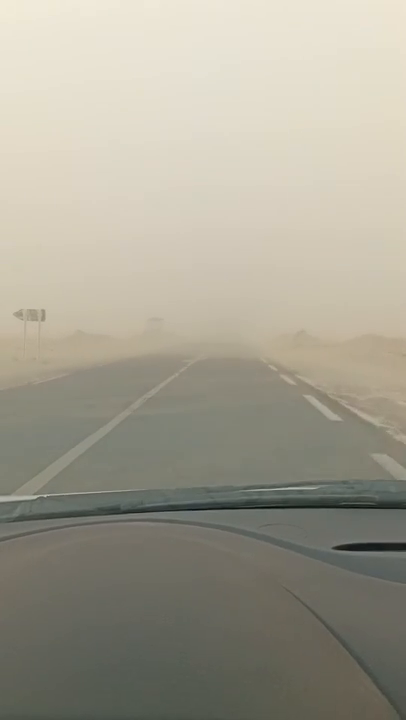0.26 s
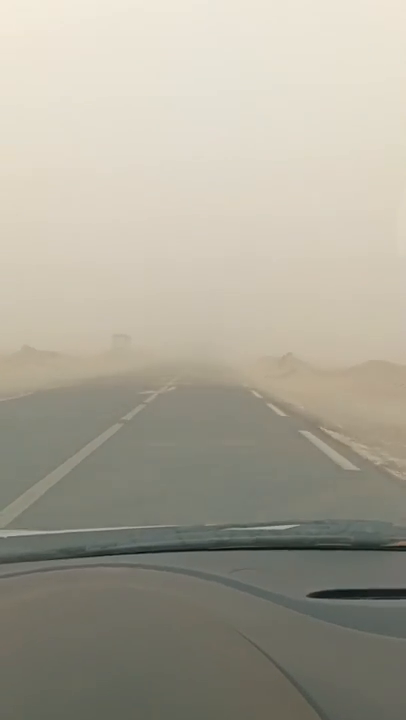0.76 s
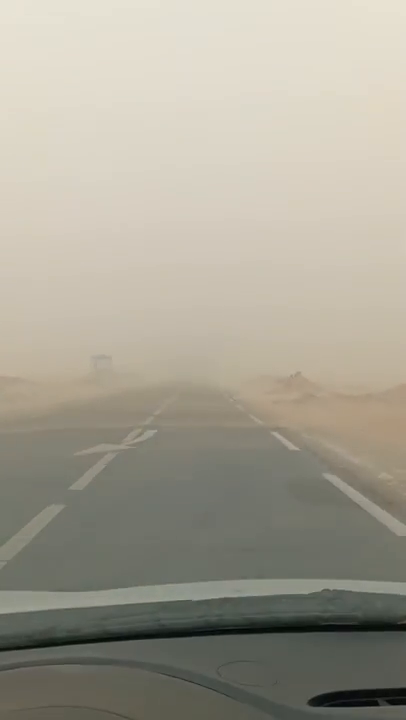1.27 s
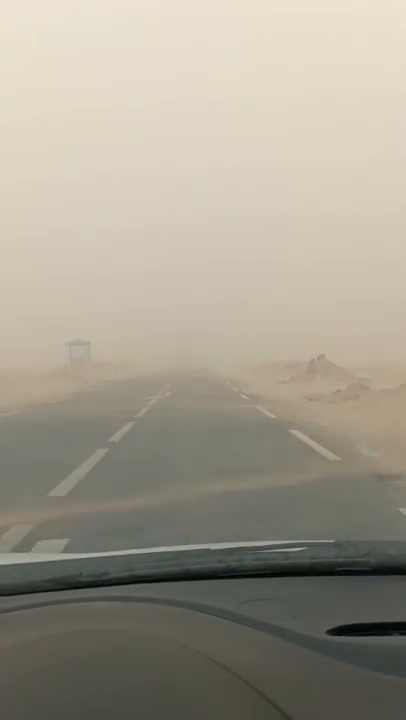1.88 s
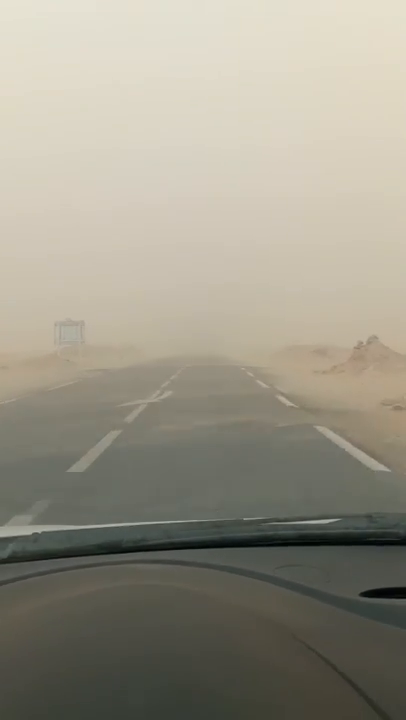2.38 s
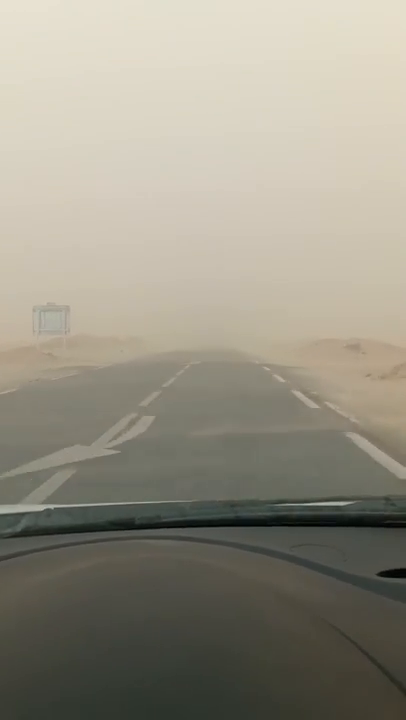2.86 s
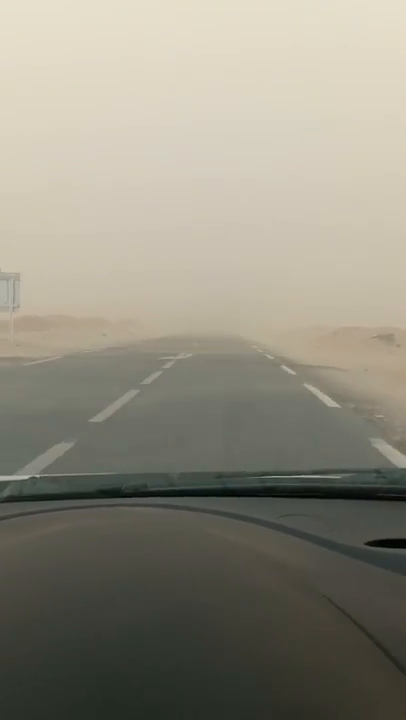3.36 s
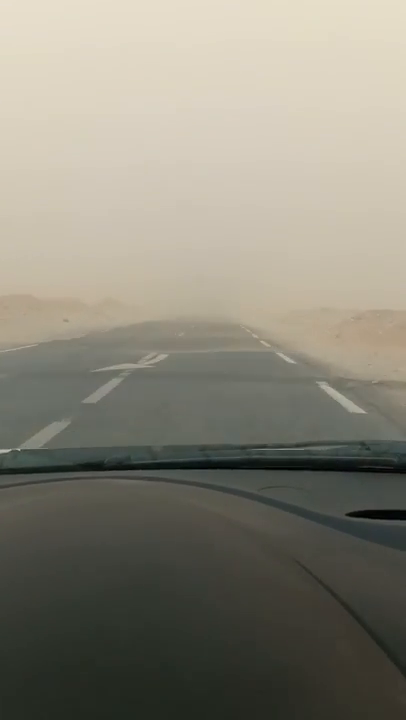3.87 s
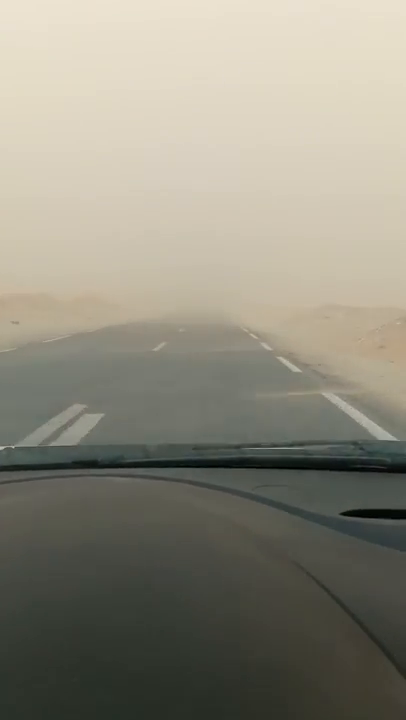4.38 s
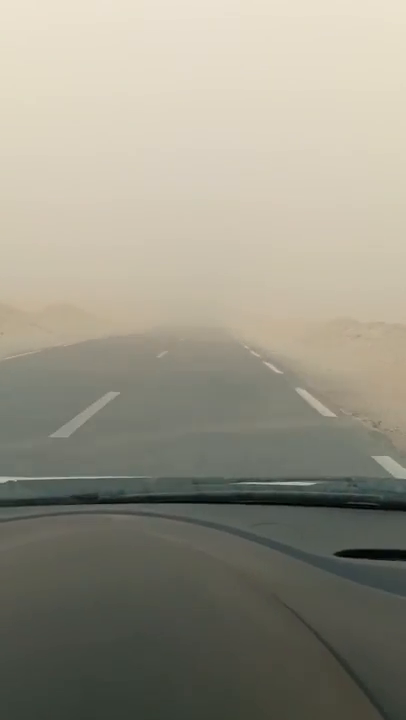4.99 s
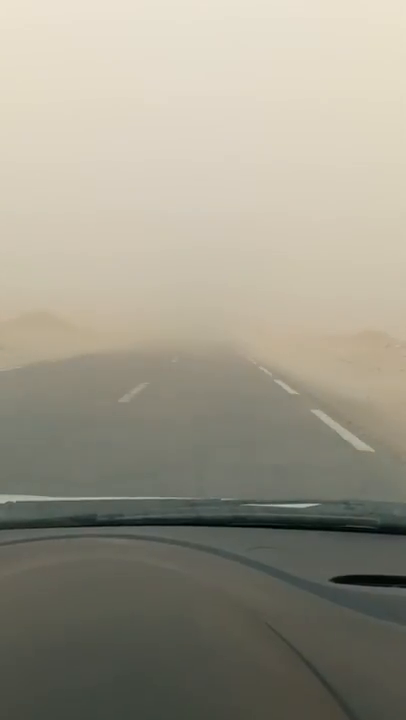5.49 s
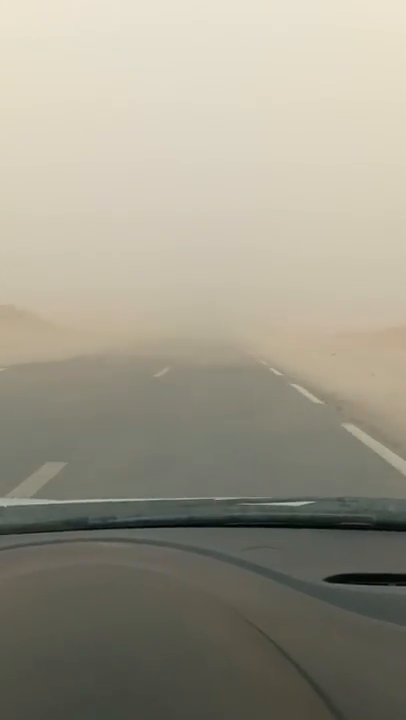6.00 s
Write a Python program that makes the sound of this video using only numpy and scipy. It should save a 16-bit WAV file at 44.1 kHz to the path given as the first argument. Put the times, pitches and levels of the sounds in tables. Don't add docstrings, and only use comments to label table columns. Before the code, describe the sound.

Inside a car cruising through a sandstorm, road bumps boom low over engine hum and tyre roar while sand and small stones hit the glass.

```python
import sys
import numpy as np
from scipy import signal
from scipy.fft import rfft, irfft, next_fast_len
from scipy.io import wavfile
from scipy.ndimage import uniform_filter1d, map_coordinates

SR = 44100
rng = np.random.default_rng(int(sys.argv[2]) if len(sys.argv) > 2 else 0)


def boost(x):
    u = np.asarray(x, float) / 20
    return 10 ** u


def unload_wav(signal):
    wavfile.write(
        sys.argv[1],
        SR,
        np.round(np.clip(np.atleast_2d(signal).T, -1, 1) * 32767).astype(np.int16),
    )


N = 275625
COARSE = np.arange(0, N, 32)


def unit(x):
    return x / np.sqrt(np.mean(x ** 2) + 1e-20)


def along(points, hz):
    f, v = np.transpose(points)
    return np.interp(np.log(hz + 1), np.log(f + 1), v)


def curves(rows):
    s, *cols = np.transpose(rows)
    return [np.interp(np.arange(N) / SR, s, c) for c in cols]


def wobble(rate_hz):
    knots = rng.standard_normal(int(N * rate_hz / SR) + 4)
    return map_coordinates(knots, [np.arange(N) * rate_hz / SR])


def filtered(x, response):
    m = next_fast_len(N + SR // 2)
    return irfft(rfft(x, m) * response(np.fft.rfftfreq(m, 1 / SR)), m)[..., :N]


def passed(x, low_hz, high_hz):
    sos = signal.butter(4, [float(low_hz), float(high_hz)], "bandpass", fs=SR, output="sos")
    return signal.sosfilt(sos, x) * np.sqrt(SR / 2 / (high_hz - low_hz))


def resonance(hz, width_hz):
    return lambda f: (1j * f * width_hz / (hz * hz - f * f + 1j * f * width_hz)) ** 1.864


def shape(points):
    return lambda f: boost(along(points, f))


def rush(response, patchy_db, grain=1):
    # frequency in Hz, left-right likeness from 0 to 1.
    alike = [(20, .94), (60, .945), (190, .985), (290, .95), (430, .62), (640, .3), (1400, .04), (15000, 0)]
    # frequency in Hz, left over right in dB.
    lean = [(25, 1), (60, 0), (150, -.5), (280, -4.8), (600, -.6), (1100, 3), (2300, 5), (4400, 3),
            (8100, 5.5), (15000, 3)]
    _, _, z = signal.stft(rng.standard_normal((2, N)) * grain, SR, nperseg=512)
    patches = uniform_filter1d(rng.standard_normal(z.shape[1:]), size=6, axis=0)
    patches = uniform_filter1d(patches, size=12, axis=1)
    pair = signal.istft(z * boost(patchy_db * unit(patches)), nperseg=512)[1][:, :N]
    f = np.fft.rfftfreq(N, 1 / SR)
    turn = np.arccos(along(alike, f)) / 2
    mid, side = rfft(pair) * response(f) * [np.cos(turn), np.sin(turn)]
    tilt = boost(np.outer([.5, -.5], along(lean, f)))
    pair = irfft(np.array([mid + side, mid - side]) * tilt, N)
    return pair / np.sqrt(np.mean(pair.mean(axis=0) ** 2))


def evened(x, seconds):
    power = uniform_filter1d(x.mean(axis=0) ** 2, size=round(seconds * SR))
    return x / np.sqrt(np.abs(power) + 0.17)


def swell(start_s, length_s, rise_s, fall_s):
    t = COARSE / SR - start_s
    return np.clip(t / rise_s, 0, 1) ** 2 * np.exp(-np.maximum(t - length_s, 0) / fall_s)


def bell(middle_s, length_s):
    return np.exp(-4 * ((COARSE / SR - middle_s) / length_s) ** 2)


def added(steady, events):
    return np.sqrt(steady + np.interp(np.arange(N), COARSE, events))


def engine():
    # time in seconds, hum level in dB.
    load = [(0, -41.5), (.3, -39.5), (.7, -35), (.9, -36), (1.6, -42), (1.8, -28.5), (2.3, -38),
            (2.5, -29.5), (3.3, -34.5), (3.9, -33), (4.3, -38), (4.7, -32), (5.05, -36), (5.25, -30),
            (5.6, -35.5), (5.85, -28.5), (6.25, -33)]
    # multiple of the firing rate, level in dB.
    orders = [(1, 4), (2, -12.5), (3, -28.5), (4, -13.5)]
    firing_hz = 60.1
    db, = curves(load)
    phase = 2 * np.pi * np.cumsum(firing_hz * (1 + 0.0352 * wobble(11))) / SR
    hum = sum(boost(level + 3.2 * wobble(22)) * np.sin(k * phase) for k, level in orders)
    return boost(db - 3.5) * hum * boost([[.3], [-.3]])


def road():
    # time in seconds, tyre roar in dB (coarseness of the tarmac).
    tarmac = [(0.0, -38), (1.51, -38.5), (1.65, -38), (1.9, -37.5), (2.18, -38.5), (2.58, -37), (2.77, -38),
              (5.24, -39.5), (5.83, -37.5), (6.25, -37)]
    # middle in seconds, strength in dB, floor over cabin boom in dB, length in seconds.
    bumps = [(0.076, -40, 11.5, 0.096), (0.227, -28.5, 3, 0.085), (.37, -26.5, -4.5, 0.047),
             (0.621, -22.5, -17, 0.077), (0.747, -29, -10, 0.036), (1.03, -30.5, -17, 0.034),
             (1.594, -22.5, -7.5, 0.031), (1.83, -39.5, 7, .08), (1.922, -41, 13, 0.02),
             (2.26, -25, -3, 0.047), (2.443, -32, -20, 0.078), (2.477, -28, -26, 0.12),
             (2.685, -28, 3.5, 0.027), (3.016, -37, -7, 0.094), (3.224, -22.5, -11, 0.042),
             (3.373, -22, -2.5, 0.042), (3.74, -29, -3.5, 0.086), (4.065, -29, -20, .06),
             (4.509, -27, 1.5, 0.082), (4.567, -28, -13, 0.059), (4.681, -26.5, -8, .08),
             (5.494, -34, 3.5, 0.076), (5.688, -27, 4, .09), (5.873, -27.5, -38, .08),
             (5.97, -37.5, 5, 0.038), (6.109, -35, 12, 0.027)]
    # middle in seconds, strength in dB, length in seconds.
    heaves = [(0.39, -44, 0.11), (0.64, -37, 0.1), (0.756, -35, 0.071), (1.07, -39, 0.1), (1.62, -33, 0.16),
              (1.753, -31.5, .1), (2.067, -36.5, .1), (2.477, -37.5, 0.088), (2.725, -43.5, 0.083),
              (3.25, -33.5, .15), (3.448, -36, .12), (4.25, -35, .1), (4.702, -33, 0.1),
              (5.723, -42, 0.093), (5.897, -36.5, 0.11), (6.116, -32, 0.23)]
    # frequency in Hz, density in dB per Hz.
    thud_spectrum = [(14, -40), (25, -12), (32, -3), (42, 0), (55, 0), (75, -2), (90, -3), (110, -20),
                     (200, -60)]
    # frequency in Hz, density in dB per Hz.
    roar_spectrum = [(100, -50), (170, -3.5), (286, -10.5), (319, -12.5), (382, -6.5), (447, -12),
                     (643, -14.5), (786, -19.5), (876, -18.5), (1080, -23), (1170, -33), (1500, -33.5),
                     (1950, -54), (3300, -120)]
    thud_db, boom_db, panel_db = -1.5, 2.5, 2
    bump_roar_db = -15

    roar = boost(curves(tarmac)[0]) ** 2
    boom = sum(boost(db) ** 2 * bell(s, length) for s, db, _, length in bumps)
    panel = sum(boost(db + floor_db) ** 2 * bell(s, length) for s, db, floor_db, length in bumps)
    spring = sum(boost(db) ** 2 * bell(s, length) for s, db, length in heaves)

    suspension = evened(rush(shape(thud_spectrum), patchy_db=-4.0), seconds=0.21)
    cabin_air = evened(rush(resonance(hz=110.5, width_hz=38.8), patchy_db=4.0), seconds=0.049)
    floor = evened(rush(resonance(hz=164.4, width_hz=19.8), patchy_db=-0.5), seconds=0.045)
    low = added(roar * boost(2 * thud_db), spring) * suspension
    low += added(roar * boost(2 * boom_db), boom) * boost(2.0) * cabin_air
    low += added(roar * boost(2 * panel_db), panel) * boost(-1.5) * floor

    whine = rush(resonance(hz=868, width_hz=20.7), patchy_db=2.0)
    tread = rush(shape(roar_spectrum), patchy_db=0.5) + boost(-19) * whine
    tread_gain = added(roar, (boom + panel) * boost(2 * bump_roar_db))
    return low + tread_gain * boost(0.15 * wobble(13)) * tread


def trim():
    # time in seconds, peak in dB, pitch in Hz, left over right in dB.
    knocks = [(0.312, -39, 656, -2), (0.592, -31.5, 558, -7), (0.751, -29.5, 518, -3),
              (1.559, -29, 555, -11), (1.711, -31.5, 502, -10), (1.739, -44, 617, 10),
              (1.767, -33, 526, -7), (2.239, -31, 696, -8), (2.404, -31.5, 630, -5), (2.446, -37, 560, -7),
              (2.517, -33, 545, -8), (2.609, -33, 530, -7.5), (2.663, -30, 680, -3), (2.821, -34, 718, 3),
              (3.383, -32, 616, 2.5), (4.318, -57, 506, -14), (5.659, -30.5, 537, -4),
              (5.859, -38, 590, -7), (6.229, -38.5, 680, 2)]
    modes = [(.6, 0.63), (.86, 0.72), (1, 1), (1.12, 0.55), (1.3, 0.12)]
    t60_s, attack_s = 0.087, .0022
    out, t = np.zeros((2, N + SR)), np.arange(SR // 5) / SR
    fade = boost(-60 * t / t60_s) * (1 - np.exp(-t / attack_s))
    for s, db, hz, pan_db in knocks:
        phase = rng.uniform(-0.61, 1.0, (2, 1))
        ring = sum(gain * np.sin(2 * np.pi * k * hz * t + phase) for k, gain in modes)
        level = boost(db + 1.0 + pan_db * np.array([[.5], [-.5]]))
        out[:, round(s * SR):][:, :len(t)] += level * ring * fade
    return out[:, :N]


def storm():
    # time in seconds, wind at the door seals in dB.
    wind_curve = [(0.0, -53.5), (0.5, -55.5), (0.75, -53.5), (3.04, -55), (3.36, -53), (5.59, -56.5),
                  (5.97, -52), (6.25, -61)]
    # start in seconds, length in seconds, sand in dB, finest dust over it in dB.
    sheet_rows = [(0.162, 0.088, -62.5, -15.5), (0.58, 0.12, -59.5, -19), (0.784, 0.21, -54.5, -15),
                  (1.384, 0.3, -56, -9), (1.587, 0.18, -57, -11), (1.965, 0.28, -64, -13),
                  (2.16, 0.23, -62, -12.5), (2.954, .04, -57.5, -10.5), (3.1, 0.25, -58.5, -13.5),
                  (3.46, .4, -69, -8), (3.939, 0.035, -56, -12), (4.092, 0.038, -56.5, -12.5),
                  (4.24, .25, -60.5, -11.5), (4.66, 0.24, -69.5, -12.5), (4.961, 0.046, -60, -6.5),
                  (5.024, 0.063, -59, -12), (5.765, .15, -58, -6.5), (5.87, .4, -55, -8.5)]
    # frequency in Hz, density in dB per Hz.
    seal_spectrum = [(650, -9.5), (1100, -3.5), (1200, -5), (1600, -9), (1800, -4.5), (2400, -7.5),
                     (2900, -12), (3400, -19), (5000, -24), (8000, -56.5), (15000, -120)]
    sand_spectrum = [(1300, -30), (2200, 2), (2900, -2), (3300, -10.5), (3750, -2.5), (4600, -5),
                     (5300, -1), (5750, -5), (6550, -12.5), (8000, -21.5), (9700, -43), (11500, -37),
                     (17600, -56)]
    dust_spectrum = [(6500, -22), (7600, -11.5), (9700, -12), (11300, -3), (12600, -6), (13700, 5),
                     (15600, -3.5), (17000, -28.5)]
    rise_s, fall_s = .045, 0.029
    sheet_wind_db = -4.5
    drift_db, drift_dust_db = -67.5, -19
    drift_grows = 1.5

    wind_db, = curves(wind_curve)
    drift = boost(drift_db + drift_grows * (wind_db - wind_db.mean())) ** 2
    sheets = [boost(db) ** 2 * swell(s, length, rise_s, fall_s) for s, length, db, _ in sheet_rows]
    dust = sum(sheet * boost(2 * row[3]) for sheet, row in zip(sheets, sheet_rows))
    grain = boost(3.4 * np.minimum(rng.exponential(size=(2, N)), 5))
    coarse = rush(shape(sand_spectrum), patchy_db=0.9, grain=grain)
    coarse = added(drift, sum(sheets)) * boost(1.0) * coarse
    fine = rush(shape(dust_spectrum), patchy_db=2.0, grain=grain)
    fine = added(drift * boost(2 * drift_dust_db), dust) * boost(-4.0) * fine
    gusts = added(boost(2 * wind_db), sum(sheets) * boost(2 * sheet_wind_db))
    wind = gusts * boost(0.95 * wobble(23)) * rush(shape(seal_spectrum), patchy_db=-2.6)
    return boost(1.1 * wobble(37)) * (coarse + fine) + wind


def stones():
    # time in seconds, low ring in dB, high ring over low in dB, fizz over high ring in dB.
    hits = [(0.175, -50.5, 1, -8), (.633, -43.5, -7, -19), (.6477, -37, -19, -16), (.6678, -46.5, 3, -15.5),
            (0.6802, -31, -2.5, -5.5), (0.697, -44.5, 0.5, -5), (.757, -43, -3.5, -12),
            (1.3396, -51, 1, -24), (1.3765, -51, 4, -9.5), (1.4044, -53, 3.5, -13), (1.418, -53.5, 10, -14),
            (1.764, -34, -30, -4), (2.4554, -45, -8, -4), (2.9666, -46.5, 0.5, -13),
            (3.3974, -26, -20, -14), (3.4204, -44.5, -6, -22), (3.483, -52, -12.5, -12),
            (3.512, -54.5, 1, -21), (3.5734, -46, -16, -13), (3.738, -40.5, -20, -11),
            (3.9344, -53.5, 5.5, -9), (3.954, -50, 7.5, -8), (3.995, -46.5, 10.5, -9.5),
            (4.131, -40, -1, -11), (4.6521, -43.5, -6, -1), (4.6778, -42.5, -14, -14),
            (4.7056, -44.5, -18, -13.5), (5.0506, -42.5, 10.5, -13), (5.8646, -35.5, -12, -13.5),
            (6.24, -35, -7, -11)]
    # from in Hz, to in Hz, t60 in seconds.
    glass = [
        (1295, 3400, 0.036),
        (3730, 6200, 0.036),
        (6370, 17000, 0.022),
    ]
    # frequency in Hz, gain in dB.
    fizz_colour = [(6400, -3), (8000, -9), (10000, -10), (13000, 2), (16000, 1)]
    ring_db = -6
    lean_db = 4
    crack_t60_s = 0.013
    slap_s, slap_db = 3.3985, -34.5
    door = (246, 1246, 0.22)

    bands, t = np.zeros((len(glass) + 1, 2, N)), np.arange(SR // 10) / SR
    pan = lean_db * np.array([[.5], [-.5]])
    for s, db, high_db, fizz_db in hits:
        for band, level, (_, _, t60) in zip(bands, [0, high_db, high_db + fizz_db], glass):
            fade = boost(-60 * t / t60) + 0.67 * boost(-60 * t / crack_t60_s)
            burst = fade * rng.standard_normal((2, len(t)))
            spot = band[:, round(s * SR):][:, :len(t)]
            spot += boost(db + level + ring_db + pan) * burst[:, :spot.shape[1]]
    bands[2] = filtered(bands[2], shape(fizz_colour))
    slap = boost(slap_db - 60 * t / door[2] + np.array([[3], [-4]])) * rng.standard_normal((2, len(t)))
    bands[-1][:, round(slap_s * SR):][:, :len(t)] = slap
    return sum(passed(band, low_hz, high_hz) for band, (low_hz, high_hz, _) in zip(bands, [*glass, door]))


def scene():
    return engine() + road() + trim() + storm() + stones()


def roll_off(x):
    return signal.sosfilt(signal.butter(12, 16330, fs=SR, output="sos"), x)


def record(dry):
    edge_s, hiss_db, top_hz = .004, -99, 15650
    t = np.arange(N) / SR
    edges = np.clip(np.minimum(t, t[-1] - t) / edge_s, 0, 1)
    hiss = boost(hiss_db) * rng.standard_normal(dry.shape)
    return roll_off(filtered(edges * dry + hiss, lambda f: f < top_hz))


dry = scene()
out = record(dry)
unload_wav(out)
```